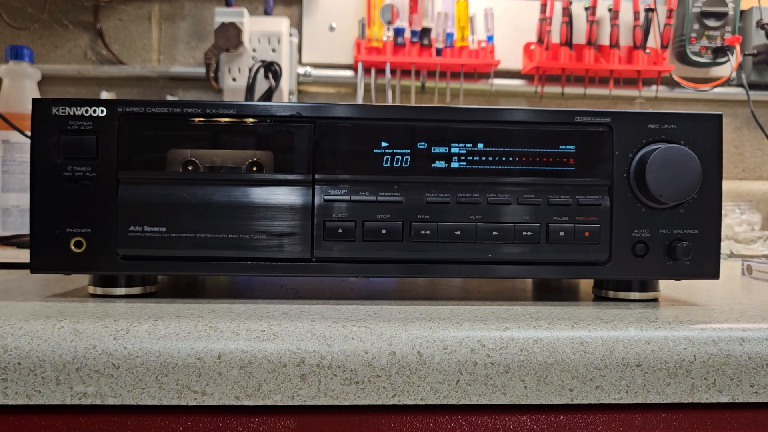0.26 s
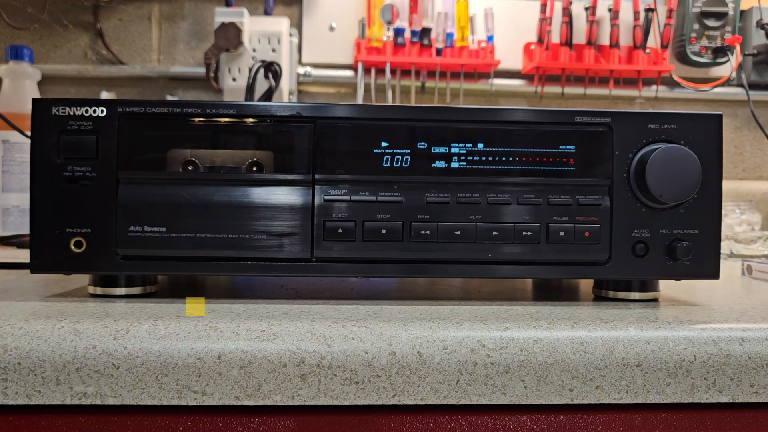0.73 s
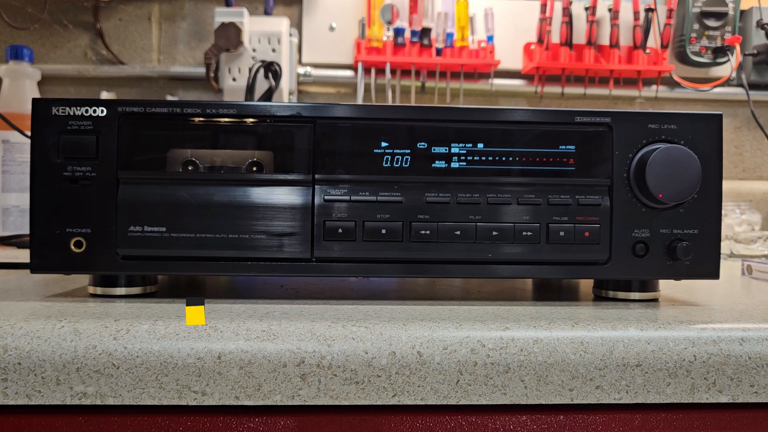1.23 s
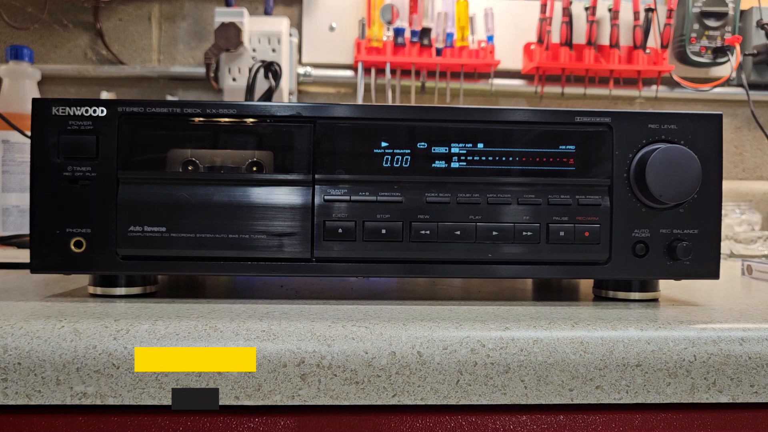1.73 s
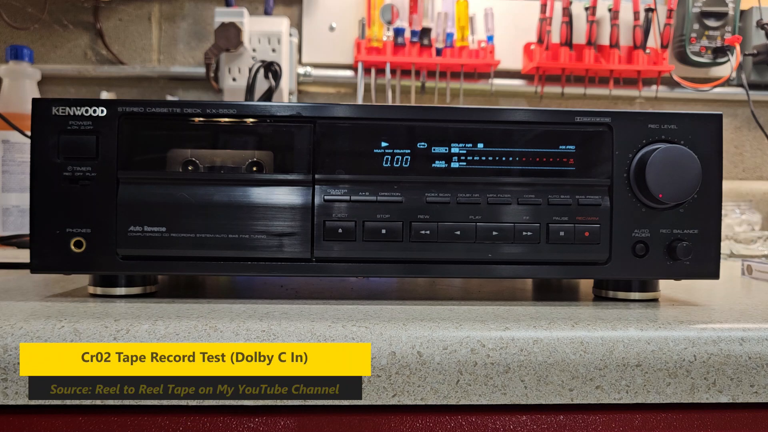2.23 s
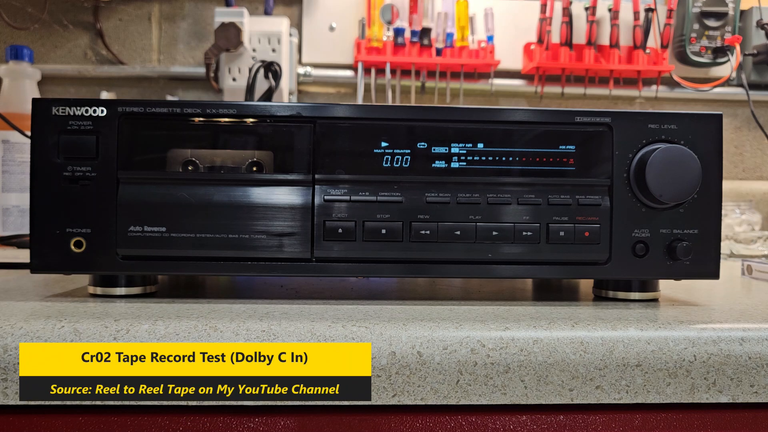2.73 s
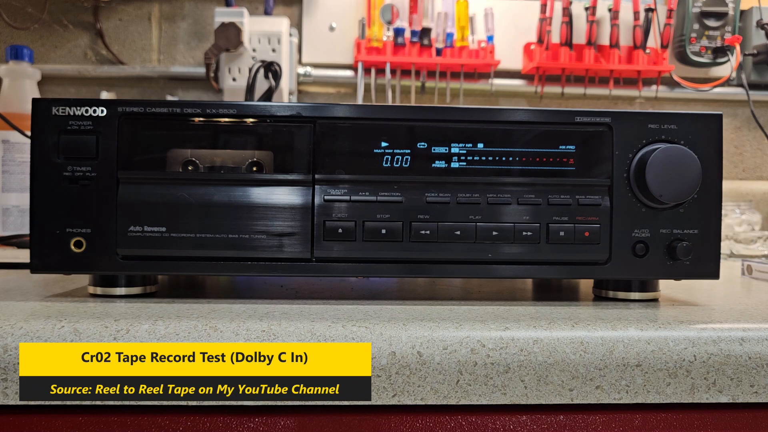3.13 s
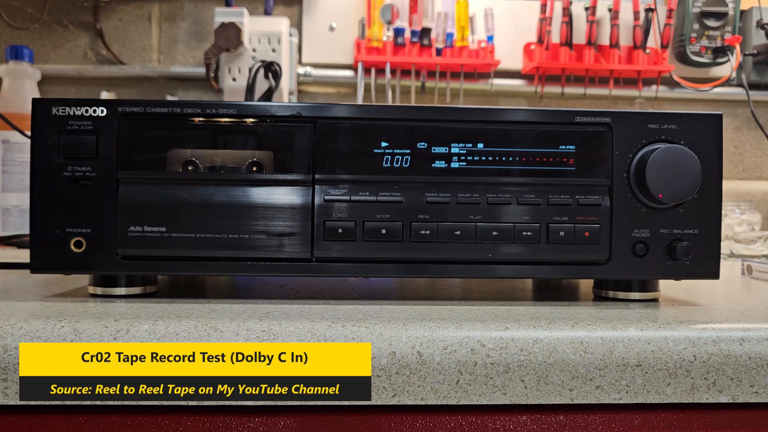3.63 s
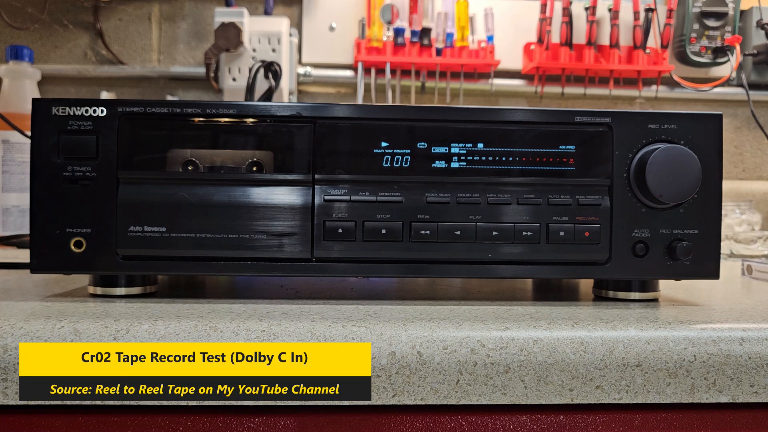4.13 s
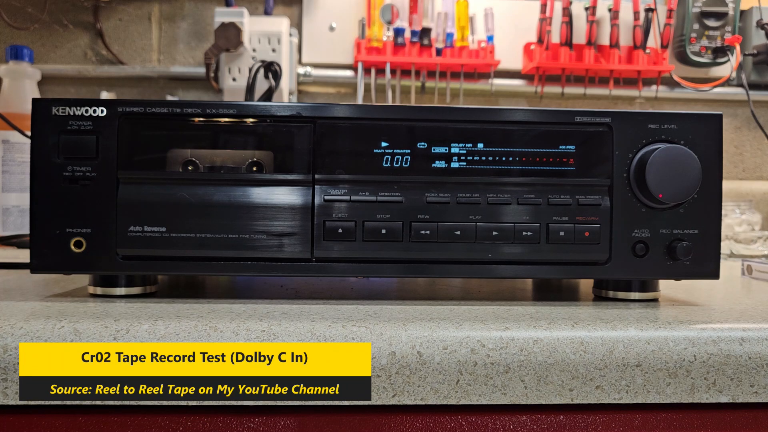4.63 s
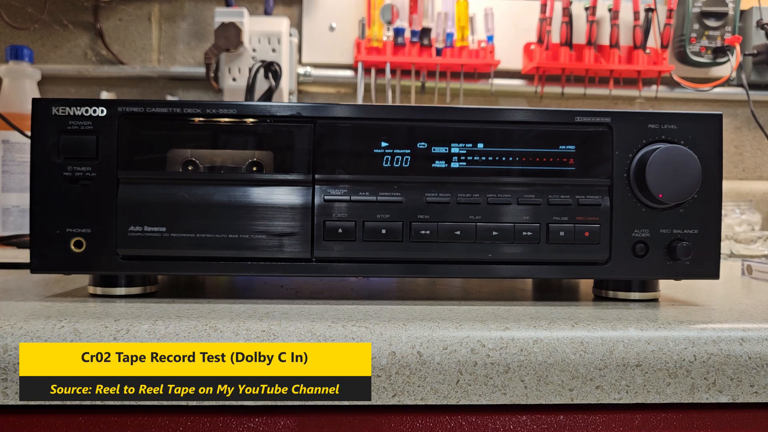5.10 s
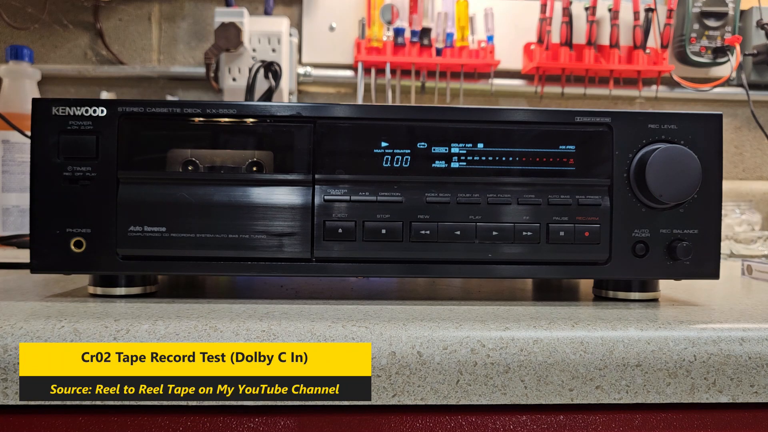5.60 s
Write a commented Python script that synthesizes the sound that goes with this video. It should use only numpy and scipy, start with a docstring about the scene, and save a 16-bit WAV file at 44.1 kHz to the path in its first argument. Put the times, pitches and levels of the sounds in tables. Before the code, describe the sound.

A low steady hum fills a quiet workshop while a hard plastic button snaps three times, each click clattering briefly and ending in a dull knock.

```python
"""Button clicks beside an idling tape deck

A tape deck idles in a workshop; a plastic button is clicked three times, a little to the left: contacts
ring the housing modes, loose parts clatter, a small delay network adds the room. Low knocks follow.
Three machines in the building hum as sums of shaft orders; two run at nearly one speed and beat slowly.
A wavering whine, faint blips, a lumpy low rumble and shaped noise lie under it; hiss is louder at first."""
import sys
import numpy as np
from scipy import signal
from scipy.fft import rfft, irfft, next_fast_len
from scipy.io import wavfile

SR = 44100
rng = np.random.default_rng(int(sys.argv[2]) if len(sys.argv) > 2 else 0)


def generate_wav(signal):
    """Clip the signal to [-1, 1] and save it as 16-bit WAV at the path in sys.argv[1]."""
    frames = np.transpose(np.atleast_2d(signal))
    scaled = np.clip(frames, -1, 1) * 32767
    pcm = np.round(scaled).astype(np.int16)
    wavfile.write(sys.argv[1], SR, pcm)


N = 258470
TIME_S = np.arange(N) / SR
BINS_HZ = np.maximum(np.fft.rfftfreq(N, 1 / SR), 10)

# Motors: speed [turns/s], time of one crest [s], orders (order, level before panning [dB rms])
MOTOR_A = 47.70, 0.0001, [(1, -51.6), (2, -79)]
MOTOR_B = 49.10, 0.0160, [(1, -54.9), (2, -67.4), (3, -82.5), (4, -93)]
# Slow machine: {order: level before panning [dB rms]}
SLOW_ORDERS_DB = {6: -74, 7: -74, 9: -59, 10: -65, 11: -81.5, 12: -69, 13: -69, 14: -77.5, 18: -83.5, 20:
                  -81}
SLOW_TURNS_PER_S, SLOW_CENTRE_ORDER, SLOW_PHASE_SPREAD_RAD = 5.998, 9, 1.3
DRONE_HZ, DRONE_DB, DRONE_DRIFT_DB = 112.77, -73.5, 2.0
# Hum balance: (frequency [Hz], left-right [dB])
HUM_PAN = [(50, 0.5), (75, -3)]
HUM_LEFT_LAG_RAD = .32

# Whines: (frequency [Hz], relative level [dB], left-right [dB])
WHINES = [(7796, 0, 8), (11700, -13, 2)]
# Whine waver: (time [s], reference level [dB rms])
WHINE_WAVER = [(0.15, -112), (0.32, -103), (0.66, -105), (0.82, -116), (0.92, -105), (2.03, -107),
               (2.25, -102), (2.7, -103), (2.9, -116), (3.12, -102), (3.4, -111), (4.1, -104), (5.0, -104),
               (5.86, -109)]
WHINE_FLICKER_DB, WHINE_PHASE_DRIFT_RAD = 3.5, 0.78

# Background rumble and hiss: (frequency [Hz], relative density [dB per Hz])
FLOOR_SPECTRUM = [(25, -29.5), (38, -13.5), (50, -5), (75, -7.5), (110, -10), (135, -24), (195, -35.5),
                  (260, -42), (450, -47.5), (1200, -53.5), (3000, -57), (7500, -61.5), (9500, -60.5),
                  (12000, -62)]
FLOOR_DB = -65.5
# Left-right likeness of the noise: (frequency [Hz], likeness [0..1])
LIKENESS = [(60, 0.74), (130, 0.63), (280, 0.38), (600, 0.32), (1300, 0.076), (13000, 0.092)]
# Low rumble band: (frequency [Hz], relative density [dB per Hz])
RUMBLE_SPECTRUM = [(110, -29), (145, -2), (195, 1.5), (230, -6.5), (280, -30.5), (600, -70)]
# Low rumble: (time [s], level before quick lumps [dB rms])
RUMBLE_LEVEL = [(0, -88.5), (.6, -83.5), (1.4, -80), (2.3, -80), (3, -85.5), (4.2, -79.5), (5.3, -82),
                (5.86, -83)]
RUMBLE_LUMP_DB = 3.5

# Early hiss: (frequency [Hz], relative density [dB per Hz])
EARLY_SPECTRUM = [(500, -12), (1200, -6.5), (1800, -8.5), (2300, -5.5), (4800, -7.5), (8000, -2),
                  (9000, -15), (11000, -16), (12000, -9)]
EARLY_DB, EARLY_FLUTTER_DB = -79.5, 1.6
# The fade adds to the sink after the hold
EARLY_HOLD_S, EARLY_SINK_DB_PER_S, EARLY_FADE_DB_PER_S = .095, 54, 151

# Soft faint blips: (start [s], peak [dB], frequency [Hz])
BLIPS = [(.76, -90.5, 830), (2.74, -92.5, 828), (4.78, -93, 804), (5.74, -96, 830)]
BLIP_S = .1

# Button snaps: (time [s], drive level [dB], finger push re drive [dB])
CLICKS = [(2.091, -59.5, -7.5), (3.96, -58, -20), (5.334, -59.5, -20)]
# Contacts within a snap: (delay [s], level re drive [dB])
SNAP_CONTACTS = [(0, -5.5), (.0011, -22.5), (.0024, -6), (.0036, -11.5)]
SNAP_SPREAD_DB = 1.0
# Button let-go ticks: (time [s], drive level [dB])
RELEASES = [(2.19, -94), (4.011, -83.5), (4.056, -80.5), (5.386, -86.5), (5.417, -70.5)]
RATTLE_DB, RATTLE_T60_S, RATTLE_PER_S = -15, 0.035, 2900
# Housing modes: (frequency [Hz], gain [dB], t60 [s], left-right [dB])
HOUSING_MODES = [(343, 3.5, 0.013, -2.5), (462, -12, 0.083, 1), (560, -7, 0.06, -2), (809, -14, 0.099, 4.5),
                 (870, -8.5, 0.061, -5.5), (1260, -4.5, 0.044, 2), (1700, -10, 0.045, 7),
                 (2095, -25.5, 0.033, 12), (2500, -10.5, 0.05, 4), (3112, -10, 0.06, 13),
                 (3420, -16.5, 0.023, 6), (3876, -6.5, .04, -4.5), (4450, -2.5, 0.025, 1.5),
                 (4980, -5, 0.012, 1), (5590, -7, 0.017, -3.5), (6260, -1.5, 0.0057, 15.5),
                 (7350, -1.5, 0.0094, 8), (7935, -7, 0.032, 3), (11500, -7.5, 0.0024, 15),
                 (15100, -11, 0.0053, 17.5)]
RIGHT_LAG_S = .00023
ROOM_T60_S, WALL_CUT_HZ, ROOM_DB = 0.27, 8600, -18.5

# Clatter of loose parts: (frequency [Hz], relative density [dB per Hz])
CLATTER_SPECTRUM = [(200, -17.5), (300, -5.5), (600, -11.5), (1200, -10), (2000, -14), (4200, -12),
                    (6500, -18), (8000, -10.5), (9000, -32), (11000, -40), (12000, -21.5)]
CLATTER_DB, CLATTER_T60_S, CLATTER_PER_S = -11, 0.29, 3600
CLATTER_WIDTH_HZ, CLATTER_VALLEY_DB, CLATTER_PAN_DB = 90, -12, 4.4

# Low knock after each snap: (start [s], peak [dB])
KNOCKS = [(2.203, -59.5), (4.061, -57.5), (5.414, -57)]
KNOCK_HZ, KNOCK_S = 187.3, 0.045

STOPBAND_HZ, STOPBAND_DB = 15900, 40


def from_db(db):
    """Amplitude ratio of a level in dB."""
    return 10 ** (np.asarray(db) / 20)


def rms_one(x):
    """Scale to rms 1."""
    return x / np.sqrt(np.mean(x ** 2) + 1e-20)


def at_hz(points, hz):
    """Read a table along log frequency."""
    points = np.array(points)
    return np.interp(np.log(hz), np.log(points[:, 0]), points[:, 1])


def level_at_times(points):
    """Read a level table along time."""
    return np.interp(TIME_S, *np.transpose(points))


def panned(db):
    """Left and right gains that differ by db."""
    return from_db([[db / 2], [-db / 2]])


def drift(rate_hz):
    """Slow chance of spread 1: coarse noise through a double one-pole low-pass."""
    step = 40
    r = np.exp(-2 * np.pi * rate_hz * step / SR)
    noise = rng.standard_normal(N // step + 2002)
    slow = signal.lfilter([1], [1, -2 * r, r * r], noise)[2000:]  # drop the filter's start
    return np.interp(np.arange(N) / step, np.arange(len(slow)), rms_one(slow))


def coloured(spectra, colour):
    """Noise spectra shaped by a colour table and turned to sound of rms 1."""
    return rms_one(irfft(spectra * from_db(at_hz(colour, BINS_HZ)), N))


def tone(hz, db, phase_rad):
    """Sinusoid with its level given in dB rms."""
    return np.sqrt(2) * from_db(db) * np.cos(2 * np.pi * hz * TIME_S + phase_rad)


def swell(start_s, db, hz, length_s):
    """Short tone under a smooth sine-squared rise and fall."""
    part = np.clip((TIME_S - start_s) / length_s, 0, 1)
    return from_db(db) * np.sin(np.pi * part) ** 2 * np.sin(2 * np.pi * hz * (TIME_S - start_s))


def hum(hz, db, phase_rad):
    """Low tone through the bench, reaching the two sides a little out of step."""
    side_phase_rad = HUM_LEFT_LAG_RAD * np.array([[-.5], [.5]])
    return panned(at_hz(HUM_PAN, hz)) * tone(hz, db, phase_rad + side_phase_rad)


def machines():
    """Steady shaft orders and a drifting drone; the slow shaft's orders start at scattered phases."""
    out = hum(DRONE_HZ, DRONE_DB + DRONE_DRIFT_DB * drift(0.94), 0)
    for turns_per_s, crest_s, orders in (MOTOR_A, MOTOR_B):
        for order, db in orders:
            hz = order * turns_per_s
            out += hum(hz, db, -2 * np.pi * hz * crest_s)
    for order, db in SLOW_ORDERS_DB.items():
        phase_rad = -SLOW_PHASE_SPREAD_RAD * (order - SLOW_CENTRE_ORDER) ** 2
        out += hum(order * SLOW_TURNS_PER_S, db, phase_rad)
    return out


def whines():
    """Thin high tones whose level wavers and flickers while the phase drifts."""
    waver_db = level_at_times(WHINE_WAVER)
    out = np.zeros((2, N))
    for hz, db, pan_db in WHINES:
        level_db = waver_db + db + WHINE_FLICKER_DB * drift(17.0)
        out += panned(pan_db) * tone(hz, level_db, WHINE_PHASE_DRIFT_RAD * drift(6.0))
    return out


def noise_floor():
    """Stereo noise, alike in the bass, nearly unrelated in the treble; its low rumble comes in lumps."""
    mid, side = rfft(rng.standard_normal((2, N)))
    alike = np.clip(at_hz(LIKENESS, BINS_HZ), 0, 1)
    pair = np.sqrt(1 + alike) * mid + np.sqrt(1 - alike) * side * [[1], [-1]]
    lumps = from_db(level_at_times(RUMBLE_LEVEL) + RUMBLE_LUMP_DB * drift(5.4))
    return from_db(FLOOR_DB) * coloured(pair, FLOOR_SPECTRUM) + lumps * coloured(pair, RUMBLE_SPECTRUM)


def early_hiss():
    """Bright, fluttering noise that sinks gently, then fades fast."""
    hiss = coloured(rfft(rng.standard_normal((2, N))), EARLY_SPECTRUM)
    past_hold_s = np.maximum(TIME_S - EARLY_HOLD_S, 0)
    level_db = EARLY_DB - EARLY_SINK_DB_PER_S * TIME_S - EARLY_FADE_DB_PER_S * past_hold_s
    return from_db(level_db + EARLY_FLUTTER_DB * drift(40.0)) * hiss


def blips():
    """Soft faint tones that swell and go."""
    return sum(swell(start_s, db, hz, BLIP_S) for start_s, db, hz in BLIPS)


def dying(start_s, db, t60_s):
    """Gain that is zero until the start, then decays by 60 dB per t60."""
    return (TIME_S > start_s) * from_db(db - 60 * np.abs(TIME_S - start_s) / t60_s)


def contacts():
    """Snap: a quick run of hard contacts, a push and a dying rattle; release: one soft contact."""
    hard, soft = np.zeros((2, N))
    grains = rng.standard_normal(N) * (rng.random(N) < RATTLE_PER_S / SR)
    bass_cut = signal.butter(2, 1500, "high", fs=SR, output="sos")
    grains = signal.sosfilt(bass_cut, grains)  # light parts move no bass
    for start_s, db, push_db in CLICKS:
        for delay_s, part_db in SNAP_CONTACTS:
            hard[round((start_s + delay_s) * SR)] += from_db(db + part_db + rng.normal(0, SNAP_SPREAD_DB))
        hard += grains * dying(start_s, db + RATTLE_DB, RATTLE_T60_S)
        soft[round(start_s * SR)] = from_db(db + push_db)
    for start_s, db in RELEASES:
        soft[round(start_s * SR)] = from_db(db)
    return hard + signal.lfilter([0.16 ** 2], [1, -2 * .88, .88 ** 2], soft)  # low-pass dulls soft contacts


def ring(blows, hz, t60_s):
    """Two-pole resonator: a unit blow sets a decaying sine of initial height 1 ringing."""
    r, w = from_db(-60 / (t60_s * SR)), 2 * np.pi * hz / SR
    return signal.lfilter([0, np.sin(w)], [1, -2 * r * np.cos(w), r * r], blows + 1e-18)


def button():
    """Contacts ring the housing; each mode beams its own way and the right side hears it later."""
    blows = contacts()
    out = np.zeros((2, N))
    for k, (hz, db, t60_s, pan_db) in enumerate(HOUSING_MODES):
        out += (-1) ** k * from_db(db) * panned(pan_db) * ring(blows, hz, t60_s)
    out[1] = np.roll(out[1], round(RIGHT_LAG_S * SR))
    return out


def room(x):
    """Twelve feedback delays a side, duller on every round, thickened by two allpasses."""
    size = next_fast_len(N + SR)
    turn = np.exp(-2j * np.pi * np.arange(size // 2 + 1) / size)  # one-sample delay
    dull = np.exp(-2 * np.pi * WALL_CUT_HZ / SR)
    wall = (1 - dull) / (1 - dull * turn)
    response = np.zeros((2, len(turn)), complex)
    lags = (rng.uniform(.008, .04, 24) * SR).astype(int)
    for k, lag in enumerate(lags):
        loop = from_db(-60 * lag / SR / ROOM_T60_S) * wall * turn ** lag
        response[k % 2] += (-1) ** (k // 2) * loop / (1 - loop)
    for lag in (73, 191):
        response *= (turn ** lag - .6) / (1 - .6 * turn ** lag)
    return irfft(response * rfft(x, size), size)[:, :N]


def clatter():
    """Dense uneven grains, different on each side, gathered at the housing modes, dying after each snap."""
    grains = rng.standard_normal((2, N)) * (rng.random((2, N)) < CLATTER_PER_S / SR)
    fade = sum(dying(start_s, db + CLATTER_DB, CLATTER_T60_S) for start_s, db, push_db in CLICKS)
    peaks = sum(1 / (1 + ((BINS_HZ - hz) / CLATTER_WIDTH_HZ) ** 2) for hz, *rest in HOUSING_MODES)
    spectra = rfft(grains) * (from_db(CLATTER_VALLEY_DB) + peaks)
    return panned(CLATTER_PAN_DB) * fade * coloured(spectra, CLATTER_SPECTRUM)


def knocks():
    """Short low swell after each snap."""
    return sum(swell(start_s, db, KNOCK_HZ, KNOCK_S) for start_s, db in KNOCKS)


def scene():
    """Sum of all layers; only the button feeds the room."""
    background = machines() + whines() + noise_floor() + early_hiss() + blips()
    keys = button()
    reverberation = from_db(ROOM_DB) * room(keys.sum(0))
    return background + keys + reverberation + clatter() + knocks()


def record(dry):
    """A shallow dip around 10 kHz; the top is cut."""
    band = signal.butter(1, [8600, 11200], "band", fs=SR, output="sos")
    dipped = dry - .5 * signal.sosfilt(band, dry)
    top_cut = signal.cheby2(20, STOPBAND_DB, STOPBAND_HZ, fs=SR, output="sos")
    return signal.sosfilt(top_cut, dipped)


dry = scene()
out = record(dry)
generate_wav(out)
```